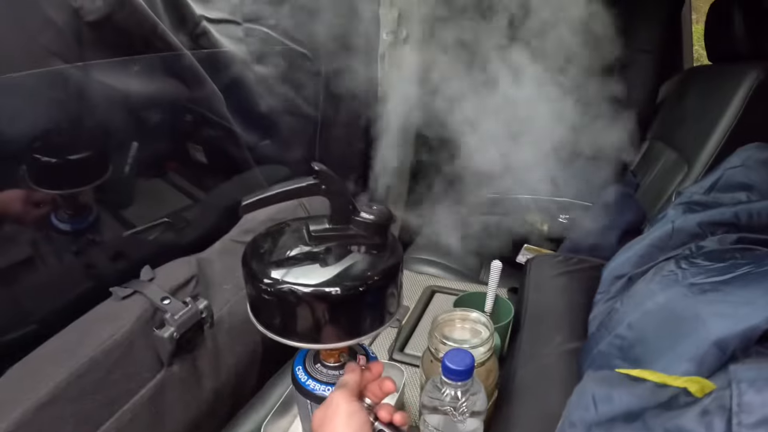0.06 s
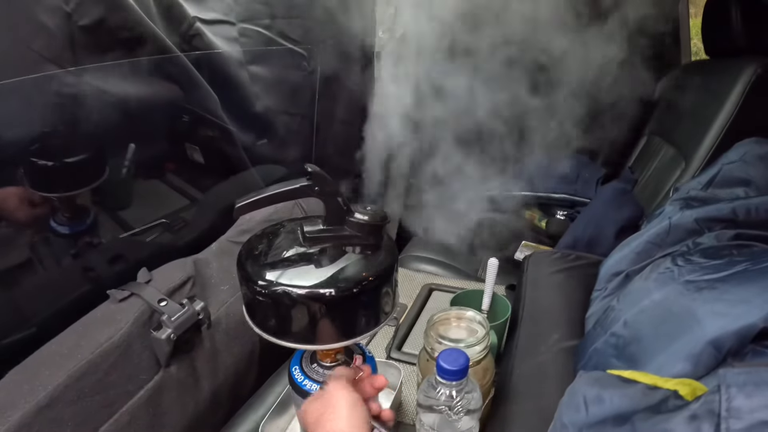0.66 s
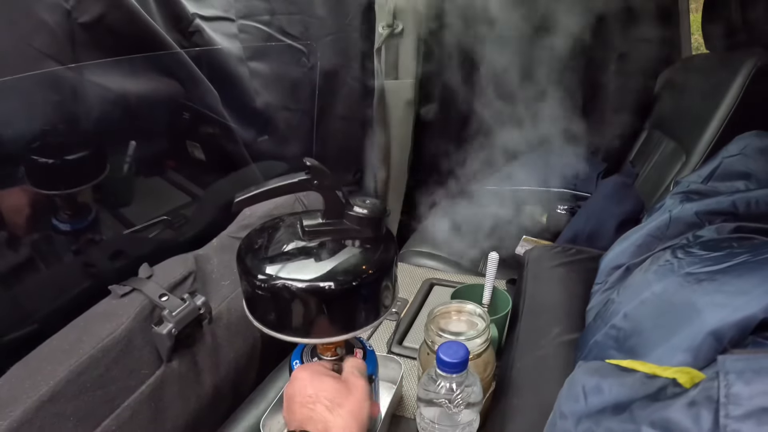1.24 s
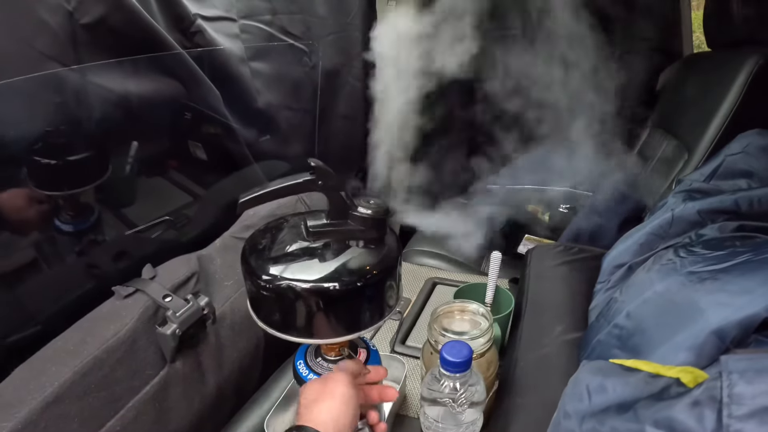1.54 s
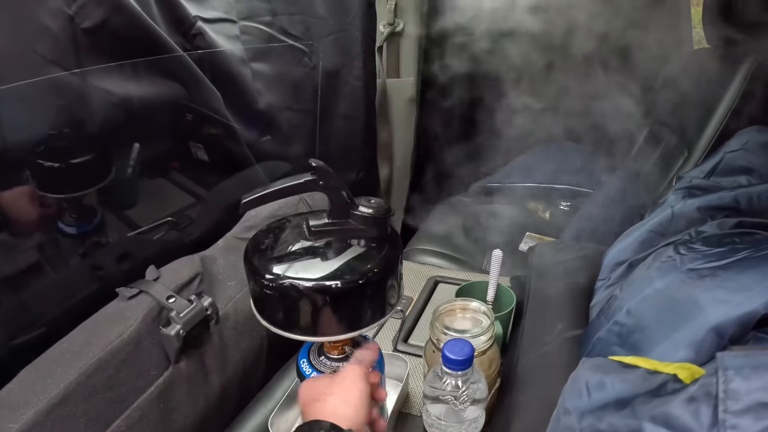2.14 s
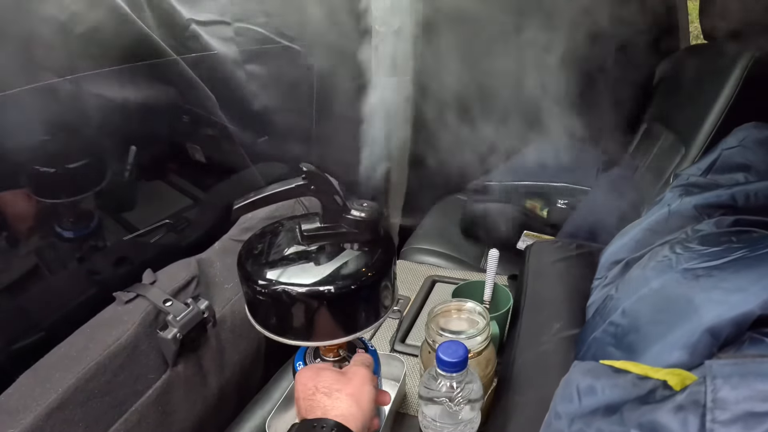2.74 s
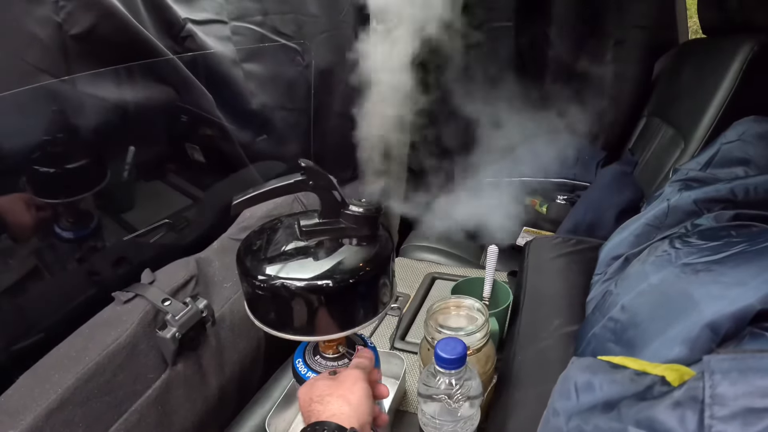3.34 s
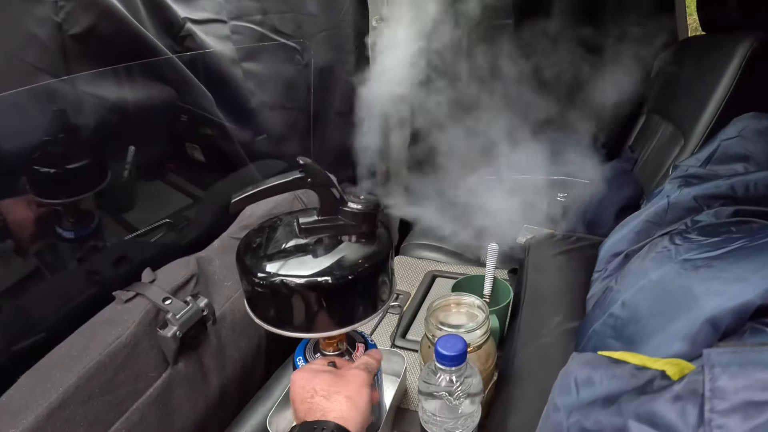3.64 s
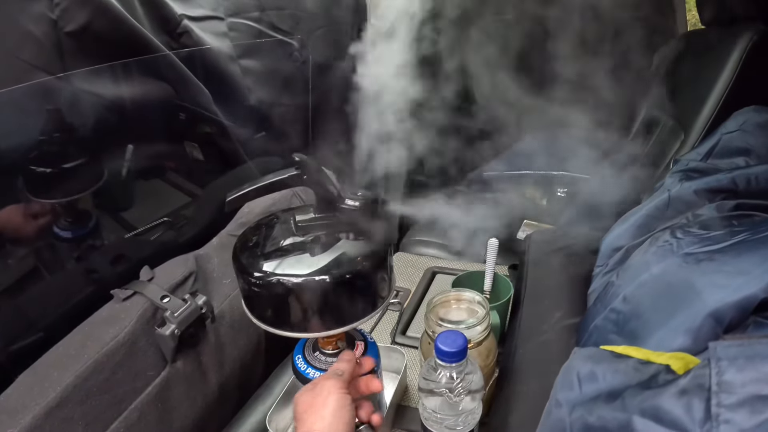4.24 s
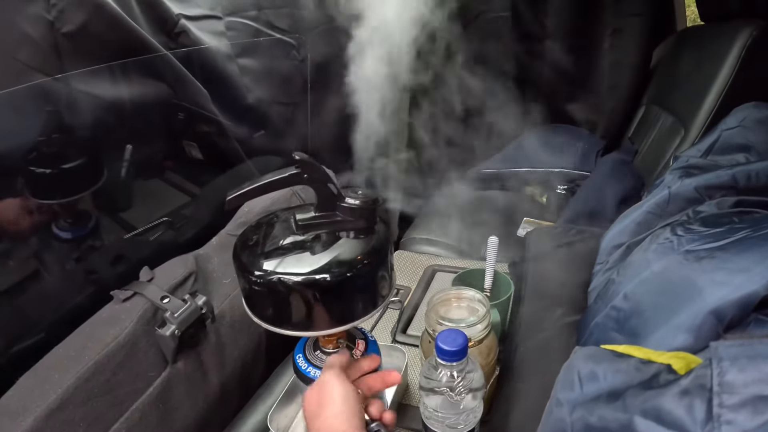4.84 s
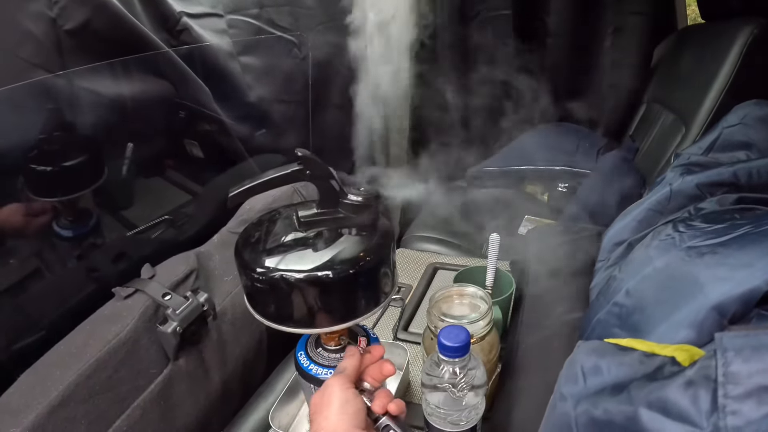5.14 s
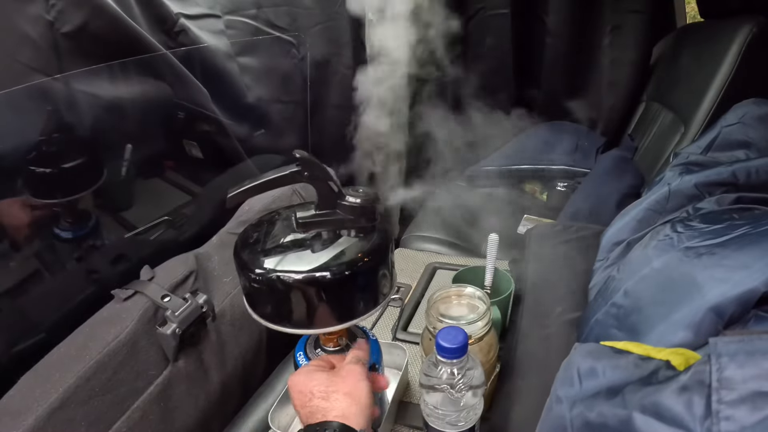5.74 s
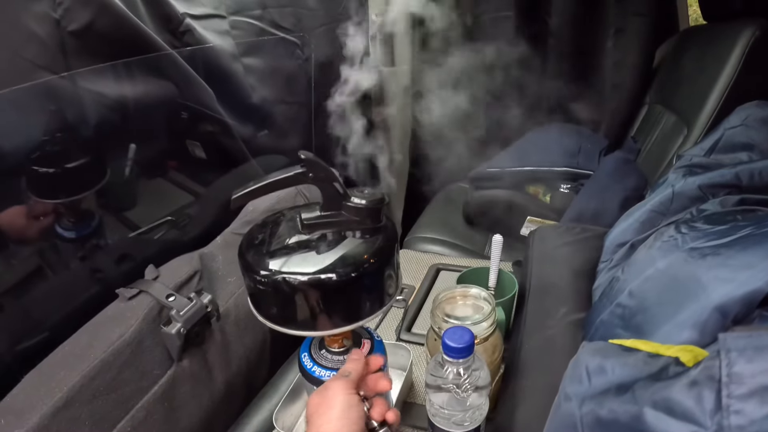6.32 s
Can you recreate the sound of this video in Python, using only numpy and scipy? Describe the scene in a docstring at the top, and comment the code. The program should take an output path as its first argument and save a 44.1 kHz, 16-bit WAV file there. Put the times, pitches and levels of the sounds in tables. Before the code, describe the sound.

Inside a small car, a kettle boils close to the microphone on a roaring gas camping burner. Its shrill whistle flutters and jumps upward over hissing steam, and the water sputters twice. Near the end the gas is shut off: the whistle sinks away, the flame flutters out with a pop and the valve ticks. The water simmers on as a sleeve brushes past and a hand rubs the stove.

```python
"""In a small car cabin, a kettle boils on a roaring gas camping burner; a sleeve brushes past.
Steam sings in the spout cap, and its surges throw the shrill, fluttering whistle upward.
Near 1.1 s and 2.3 s the boil sputters. At 5.4 s the gas is shut off: the whistle sinks away,
the flame flutters out with a pop and the valve ticks. The water simmers on while
the sleeve brushes by again and, last of all, a hand rubs the stove."""
import sys
import numpy as np
from scipy import signal
from scipy.fft import rfft, irfft, next_fast_len
from scipy.io import wavfile
from scipy.ndimage import map_coordinates

SR = 44100
rng = np.random.default_rng(int(sys.argv[2]) if len(sys.argv) > 2 else 0)


def dump_mix(stems):
    """Bounce the given channels to the path in sys.argv[1] as a 16-bit WAV at rate SR."""
    frames = np.atleast_2d(stems).T  # one column per channel
    limited = np.clip(frames, -1, 1)  # hard clip at full scale
    pcm = np.round(limited * 32767).astype(np.int16)
    wavfile.write(sys.argv[1], SR, pcm)


N = 290040

# How the cabin rings. Each row: frequency in Hz, seconds to fade by 60 dB.
CABIN_DECAY = [(200, 0.04), (4000, 0.077), (12000, 0.02)]
# The tone of each noise. Each row: frequency in Hz, relative level in dB.
WATER_TONE = [(25, -38), (60, -21.5), (140, -1.5), (320, 5), (520, -1), (800, -2), (1000, -4), (1300, -6.5),
              (2600, -9), (4200, -13), (5500, -21), (7000, -26), (8000, -37.5), (9400, -42.5), (11400, -36),
              (12700, -54)]
SPUTTER_TONE = [(40, -40.5), (200, -23), (500, 10.5), (900, -8), (1600, 2.5), (2500, -2), (4500, -8),
                (6600, -2), (8000, -19), (13000, -25)]
SLEEVE_TONE = [(40, -45), (300, -13), (700, 9), (1200, 2), (2000, 7), (3400, 3.5), (4300, 1), (5200, -18),
               (12000, -44)]
RUB_TONE = [(30, -35), (130, 3), (260, -16), (500, 13), (650, -3), (900, -14), (2000, -29), (6000, -52)]
TICK_TONE = [(1500, -22), (4000, 4), (5200, 9), (7500, -6), (9000, -19), (11500, -8), (14000, -30)]
FLAME_TONE = [(25, -53), (45, -46), (62, -23.5), (90, -10), (150, 0.5), (250, 0.5), (310, -5.5), (380, -8),
              (450, -22.5), (700, -25.5), (1150, -33), (1450, -40.5), (3300, -26.5), (5000, -68)]
STEAM_TONE = [(1500, -7), (2900, 6.5), (3150, 2.5), (3470, -5), (3750, 0.5), (4800, 1), (6300, -1),
              (7700, -8), (8500, -14.5), (8800, -51), (9500, -20.5), (11500, -10.5), (12100, -30),
              (12700, -19.5)]
# How each lasting noise rises and falls. Each row: time in seconds, level in dB.
SIMMER_LEVEL = [(0, -38.5), (.9, -35.5), (2.2, -42), (3.2, -43.5), (3.7, -36), (5.3, -36.5), (5.75, -40.5),
                (6.15, -39), (6.4, -36.5)]
RUB_LEVEL = [(0, -90), (6.44, -93), (6.465, -35), (6.58, -39)]
BURNER_LEVEL = [(0, -26.5), (.6, -26.5), (1.0, -24.5), (1.2, -25.5), (4.35, -25), (4.65, -25.5),
                (5.415, -25), (5.45, -38.5), (5.58, -43.5), (5.66, -53), (6.58, -92)]
STEAM_LEVEL = [(0, -39), (.8, -36), (3.5, -36.5), (4.6, -35), (5.36, -35.5), (5.45, -44), (5.55, -55),
               (5.65, -60), (6.58, -71)]
# Short bursts of noise. Each row: middle in seconds, half-length in seconds, level in dB.
BOIL_SPUTTERS = [(1.066, .012, -24.5), (2.291, .012, -24)]
SLEEVE_BRUSHES = [(.195, 0.067, -33), (6.256, 0.01, -33.5), (6.29, 0.035, -38)]
# The sharp spit of a sputter, then light metal ticks at the valve.
# Each row: start in seconds, level in dB, seconds to fade by 60 dB.
SHARP_TICKS = [(2.289, -19, 0.028), (5.58, -34, 0.04), (5.715, -47, .08), (5.799, -35.5, 0.14)]
# Faint tones of spout and sleeve. Each row: middle in seconds, half-length in seconds,
# pitch in Hz, slide in Hz per second, level in dB.
FAINT_CHIRPS = [(5.415, 0.0065, 3650, 11, -24), (5.554, 0.019, 4000, -3500, -40),
                (5.63, 0.032, 1055, -1500, -45), (5.63, .02, 4270, -4000, -52),
                (6.015, .02, 4130, 1000, -47), (6.05, .015, 4840, -4000, -52),
                (6.27, 0.0042, 3310, 6000, -30)]
# Notes of the burner and the gap under the kettle. Each row: pitch in Hz, width in Hz, relative dB.
BURNER_NOTES = [(849, 50.5, -4), (1006, 53, -6), (1124, 57, -6.5), (1437, 32, -11.5), (1773, 57, -16),
                (1945, 57, -9), (2468, 107, 0), (2590, 66, -2.5), (3100, 103, -10.5)]
# Flaps and last pop of the flame. Each row: middle in seconds, half-length in seconds,
# pitch in Hz, level in dB.
FLAME_FLAPS = [(1.034, 0.0032, 337, -18), (1.061, 0.0027, 417, -18.5), (1.142, 0.0041, 502, -29.5),
               (2.28, 0.0057, 300, -20.5), (4.333, 0.0075, 514, -29.5), (4.358, 0.0066, 550, -31),
               (4.399, 0.009, 593, -28), (5.468, 0.0061, 514, -26), (5.507, 0.018, 518, -32.5),
               (5.549, 0.01, 604, -30), (5.586, 0.0047, 560, -28.5), (5.587, 0.0046, 250, -31)]
# The boil that drives the whistle. Each row: time in seconds, resting pitch in Hz,
# whistle level in dB, rough height of the small surges in Hz.
WHISTLE_COURSE = [(0, 4030, -16.5, 210), (.48, 4008, -16, 170), (.73, 4043, -17.5, 151),
                  (.8, 4132, -17, 428), (1.15, 4054, -18, 396), (1.4, 4057, -20, 440),
                  (1.85, 4098, -20, 400), (1.92, 4132, -14.5, 171), (2.2, 4133, -15.5, 110),
                  (2.55, 4109, -20, 190), (2.8, 4110, -20, 200), (3.15, 4053, -22, 200),
                  (3.45, 4084, -22, 360), (3.87, 4053, -20, 69.5), (4.07, 4055, -23, 320),
                  (4.7, 4120, -21, 330), (5.0, 4065, -21.3, 169.7), (5.4, 4037, -19, 90.3)]
# Big surges of steam and drops in pressure. Each row: middle in seconds, pitch change in Hz,
# half-length in seconds, level change in dB.
BIG_SURGES = [(0.529, -260, .011, -13.5), (0.777, 450, 0.0071, 1.5), (0.833, 422, .011, 0.5),
              (0.918, 402, .012, -1), (0.982, 398, .012, -3), (1.119, 479.5, 0.0075, -2.5),
              (1.317, 351, .016, -2.5), (1.522, 350, .012, -2), (1.889, 600.5, .012, -8),
              (1.945, 390, .007, -3), (2.023, 311, 0.00683, -3.5), (2.252, 332, .012, -1),
              (2.503, 280, .012, -7), (2.902, 680, .013, -2.5), (3.279, 459, .009, -3),
              (3.338, 400, 0.014, 1), (3.436, 599, .013, -9), (3.548, 391, .016, -4),
              (3.683, 480, .008, -6), (4.311, 379.5, .03, 0), (4.659, 419.5, .03, 3),
              (4.751, 299, .025, 1.5), (4.892, 332, .013, 1.5), (5.188, 260, .03, -0.5),
              (5.436, 130, 0.0086, -10)]
# The note locks to the cap and flares up. Each entry: time in seconds.
FLARE_TIMES = [1.685, 2.775, 2.944, 3.1, 3.24, 5.025]
# The whistle's overtone, an octave up. Each row: its pitch in Hz, level in dB against the main note.
OVERTONE_LEVEL = [(5200, -7), (6400, -26), (7500, -25), (8050, -36.5), (8350, -33.5)]
# The microphone's tone. Each row: frequency in Hz, level change in dB.
MIC_TONE = [(8800, 0), (8930, -3), (9020, -22), (9110, -6), (9300, 0),
            (12700, 0), (13700, -15), (14100, -28)]


def amp(db):
    """Turn decibels into a number to multiply by."""
    return 10 ** (np.asarray(db) / 20)


def unit(x):
    """Scale a signal to an average strength (rms) of 1."""
    return x / np.sqrt(np.mean(x ** 2) + 1e-20)


def clock():
    """The time of every sample, in seconds."""
    return np.arange(N) / SR


def along(rows, hz):
    """Look up a table's value at a frequency, with octaves evenly spaced."""
    freqs, values = np.transpose(rows)
    return np.interp(np.log(hz + 1), np.log(freqs + 1), values)


def curve(rows):
    """Join rows of time and value with straight lines."""
    return np.interp(clock(), *np.transpose(rows))


def swell(middle, half):
    """A bell-shaped rise and fall around one moment."""
    return np.exp(-.5 * np.minimum(((clock() - middle) / half) ** 2, 100))


def wobble(rate):
    """A smooth curve through `rate` random points a second."""
    return unit(map_coordinates(rng.standard_normal(N // 10), [clock() * rate + 2], mode="wrap"))


def filtered(x, response):
    """Turn each frequency up or down as response(hz) says."""
    size = next_fast_len(N + SR // 4)
    return irfft(rfft(x, size) * response(np.fft.rfftfreq(size, 1 / SR)), size)[:N]


def rush(tone, strength=1):
    """Rushing noise with the given tone; strength can make it uneven."""
    return unit(filtered(strength * rng.standard_normal(N), lambda hz: amp(along(tone, hz))))


def puffs(rows, tone, grain_db):
    """Short, grainy bursts of noise."""
    level = sum(amp(db) * swell(s, half) for s, half, db in rows)
    return level * unit(amp(grain_db * wobble(400)) * rush(tone))


def cabin(x, echo_s=.0069, echo_gain=.47, tail_db=-12):
    """One strong echo off the side window, and the short ring of a padded cabin."""
    echo = np.pad(x, (round(echo_s * SR), 0))[:N]
    hz, t, noise = signal.stft(rng.standard_normal(SR // 6), SR, nperseg=256)
    tail = signal.istft(noise * amp(-60 * t / along(CABIN_DECAY, hz)[:, None]), SR, nperseg=256)[1]
    ring = signal.fftconvolve(x, tail / np.linalg.norm(tail))[:N]
    return x + echo_gain * echo + amp(tail_db) * ring


def simmer(bubble_db=.5):
    """Countless small bubbles make an uneven seething."""
    return amp(curve(SIMMER_LEVEL)) * rush(WATER_TONE, amp(bubble_db * wobble(300)))


def hand():
    """A sleeve brushes past, and a hand rubs the stove with a low, hollow sound."""
    return puffs(SLEEVE_BRUSHES, SLEEVE_TONE, grain_db=2) + amp(curve(RUB_LEVEL)) * rush(RUB_TONE)


def sharp_ticks(rise_s=.0018):
    """A sputter spits, and later small metal parts scrape: bright noises that die away fast."""
    level = np.zeros(N)
    for start, db, fade_s in SHARP_TICKS:
        age = np.maximum(clock() - start, 0)
        level += (1 - np.exp(-age / rise_s)) * amp(db - 60 * age / fade_s)
    return level * rush(TICK_TONE)


def chirps(waver_hz=34.6):
    """The spout's weak last notes and a squeak of the sleeve: brief, unsteady, sliding tones."""
    drift = 2 * np.pi * np.cumsum(waver_hz * wobble(180)) / SR
    sound = np.zeros(N)
    for middle, half, hz, slide, db in FAINT_CHIRPS:
        t = clock() - middle
        sound += amp(db) * swell(middle, half) * np.sin(2 * np.pi * (hz + slide * t / 2) * t + drift)
    return sound


def burner(ring_db=-7, ring_growth=.24, flicker_db=.47):
    """The swirling flame roars low and makes the burner ring, harder at full gas."""
    def body(hz):
        return sum((-1) ** k * amp(db) * 1j * hz * width / (pitch ** 2 - hz ** 2 + 1j * hz * width)
                   for k, (pitch, width, db) in enumerate(BURNER_NOTES))

    gas_db = curve(BURNER_LEVEL)
    extra_gas_db = np.clip(gas_db - np.median(gas_db), -3, 3)
    ring = amp(ring_db + ring_growth * extra_gas_db) * unit(filtered(rng.standard_normal(N), body))
    roar = amp(flicker_db * wobble(25)) * rush(FLAME_TONE)
    return amp(gas_db) * (roar + ring)


def flame_flaps(pitch_scatter=.18, flicker_db=1.5):
    """The flame flaps under the kettle, each flap a short hollow note of very unsteady pitch."""
    uneven_time = np.cumsum(np.exp(pitch_scatter * wobble(450))) / SR
    flaps = sum(amp(db) * swell(s, half) * np.sin(2 * np.pi * hz * uneven_time)
                for s, half, hz, db in FLAME_FLAPS)
    return np.sqrt(2) * flaps * amp(flicker_db * wobble(200))


def steam_hiss(pipe_hz=250, ripple_db=3, flicker_db=.86):
    """The jet hisses out of the spout, a pipe that favours 1, 3, 5... times its lowest note."""
    jet = filtered(rush(STEAM_TONE), lambda hz: amp(-ripple_db * np.cos(np.pi * hz / pipe_hz)))
    return amp(curve(STEAM_LEVEL) + flicker_db * wobble(60)) * unit(jet)


def surges(height_hz, per_second=20, unevenness=.33):
    """The pitch change in Hz as steam leaves in spurts; small ones give way to the big ones."""
    sizes = rng.uniform(.1, 1.3, 1000)
    count = np.cumsum(per_second * np.exp(unevenness * wobble(20))) / SR
    small_hz = height_hz * sizes[count.astype(int)] * np.sin(np.pi * count) ** 4
    big_shapes = np.array([swell(s, half) for s, _, half, _ in BIG_SURGES])
    big_hz = np.array([hz for _, hz, _, _ in BIG_SURGES])
    return small_hz * np.clip(1 - big_shapes.sum(0), 0, 1) + big_hz @ big_shapes


def warble(roughness, swing_hz=66, shake_hz=27, jitter_hz=44):
    """The pitch change in Hz as the jet swings unevenly and swirling steam shakes it."""
    swings_per_s = 32 + 9 * wobble(25)
    swing = swing_hz * np.sin(2 * np.pi * np.cumsum(swings_per_s) / SR)
    swing += roughness * shake_hz * wobble(140)
    swing = np.maximum(swing, .55 * swing)  # the cap resists a fall below its note
    return swing + roughness * jitter_hz * wobble(500)


def whistle(blown_hz, rest_db, gas_off_s=5.405, sink_s=.38, fade_s=.24):
    """The steam jet sings in the spout cap; once the gas is off, the note sinks and fades."""
    cooling_s = np.maximum(clock() - gas_off_s, 0)
    fade_db = -60 * (cooling_s / fade_s) ** 2
    note_hz = blown_hz * np.exp(-cooling_s / sink_s)
    surge_db = sum(db * swell(s, half) for s, _, half, db in BIG_SURGES)
    flare_db = 6 * sum(swell(s, half=.009) for s in FLARE_TIMES)
    level_db = rest_db + surge_db + flare_db + .84 * wobble(35)
    # Locked to the cap, the note is loud and clean; higher or weaker, it is rougher.
    usual_hz, usual_db = 4080, -19
    roughness = np.clip(1 + (note_hz - usual_hz) / 400 - (level_db - usual_db) / 13, .6, 1.7)
    phase = 2 * np.pi * np.cumsum(note_hz + warble(roughness)) / SR
    rasp_db = 1.2 * roughness * wobble(330)
    strength = amp(rasp_db + fade_db)
    # The wandering note clashes with its own echo, which makes it rasp.
    main_note = unit(cabin(strength * np.sin(phase)))
    overtone = unit(cabin(strength * np.sin(2 * phase)))
    return amp(level_db) * (main_note + amp(along(OVERTONE_LEVEL, 2 * note_hz)) * overtone)


def spout(hiss_db_per_hz=.0034):
    """One flow of steam drives whistle and hiss, so a surge lifts both."""
    times, *columns = np.transpose(WHISTLE_COURSE)
    rest_hz, rest_db, height_hz = (np.interp(clock(), times, column) for column in columns)
    rise_hz = surges(height_hz)
    hiss = amp(hiss_db_per_hz * rise_hz) * steam_hiss()
    return hiss + whistle(rest_hz + rise_hz, rest_db)


def scene():
    """Water, stove, hand and spout, all close by, added into one channel."""
    water = simmer() + puffs(BOIL_SPUTTERS, SPUTTER_TONE, grain_db=4.5)
    flame = burner() + flame_flaps()
    return (water + flame + sharp_ticks() + hand() + spout() + chirps())[None]


def record(dry, top_hz=14100):
    """The microphone has a narrow dip near 9 kHz and loses the highest treble."""
    return filtered(dry[0], lambda hz: amp(along(MIC_TONE, hz)) * (hz < top_hz))[None]


dry = scene()
out = record(dry)
dump_mix(out)
```